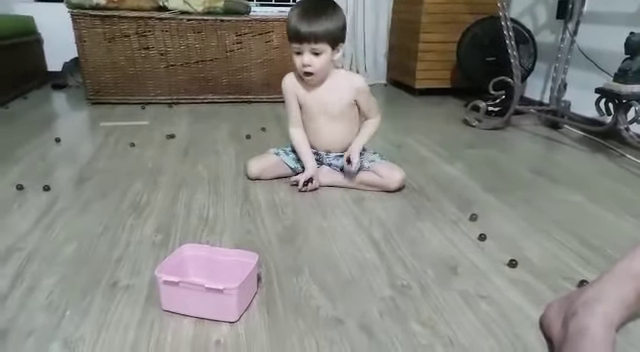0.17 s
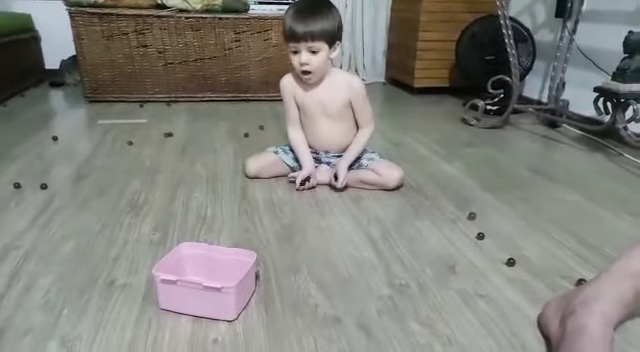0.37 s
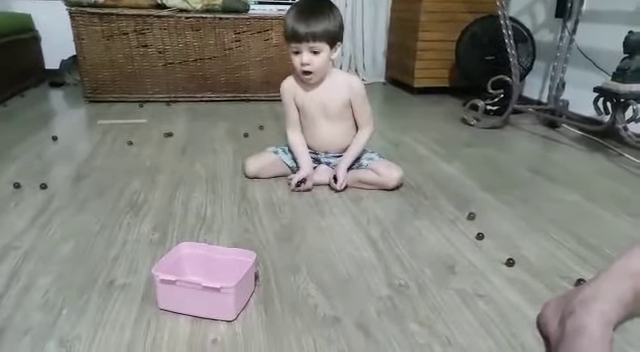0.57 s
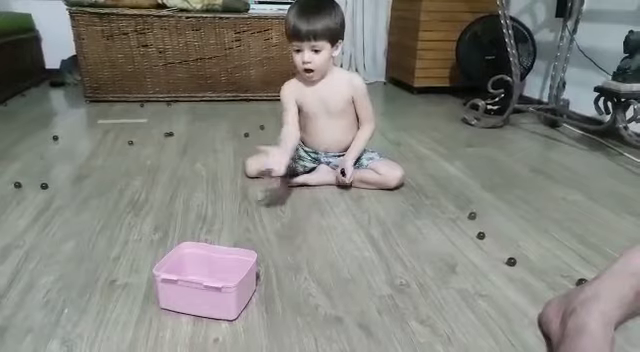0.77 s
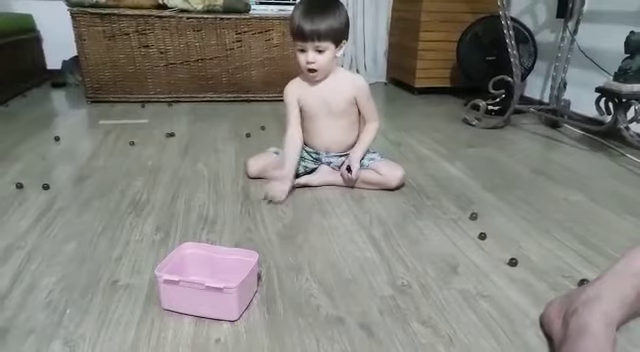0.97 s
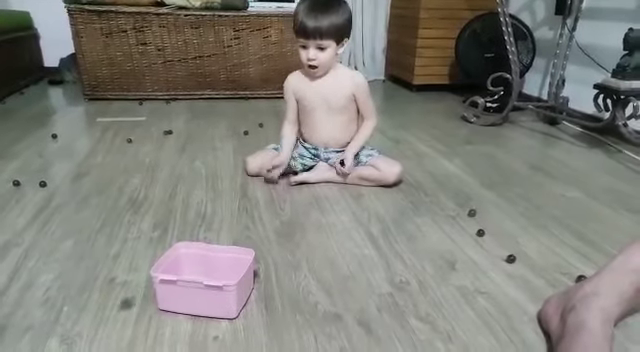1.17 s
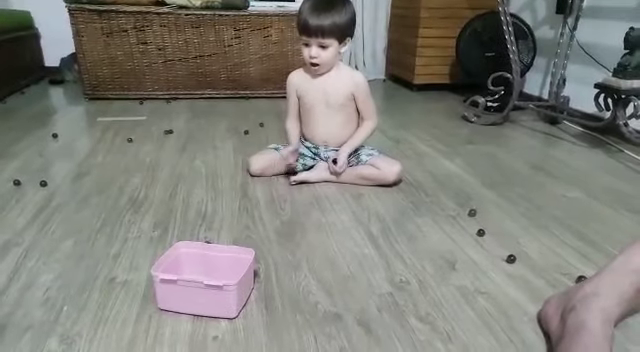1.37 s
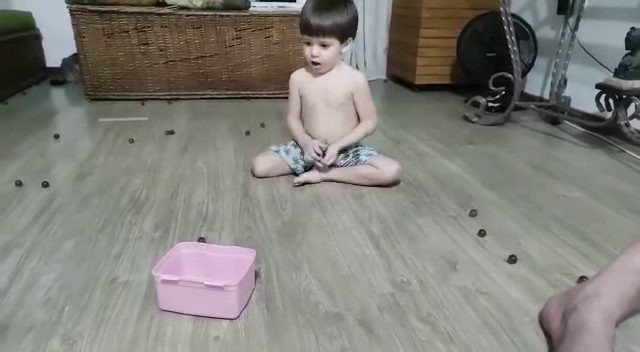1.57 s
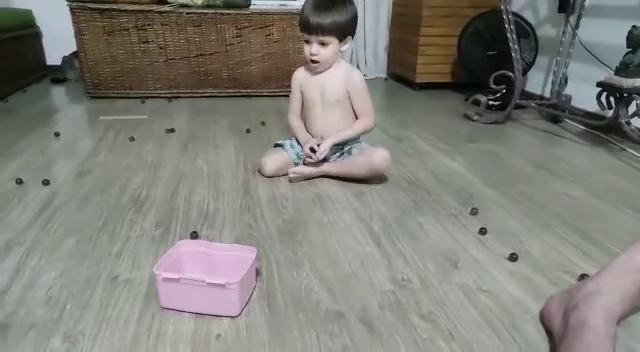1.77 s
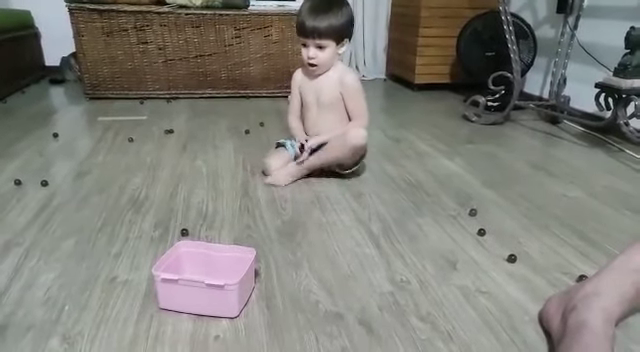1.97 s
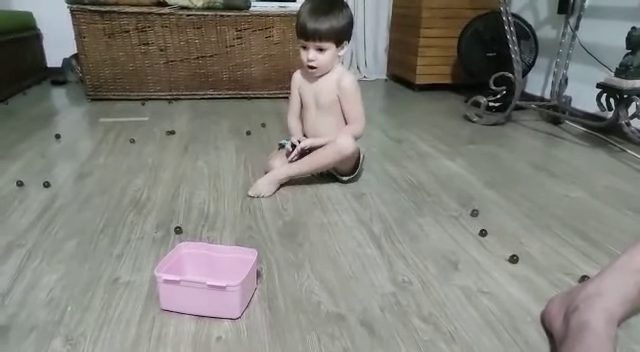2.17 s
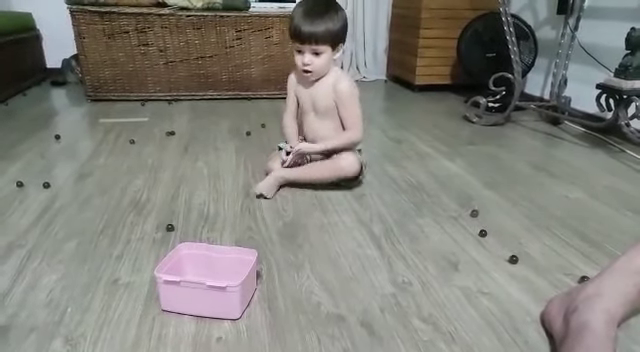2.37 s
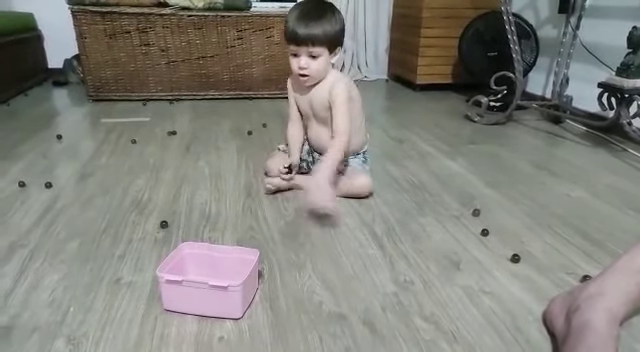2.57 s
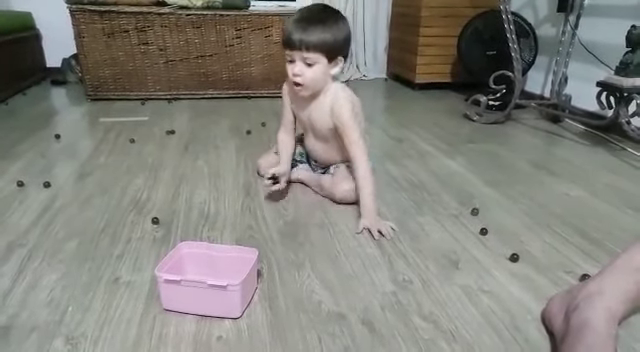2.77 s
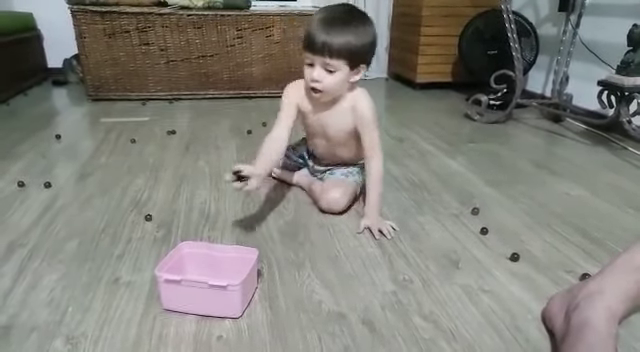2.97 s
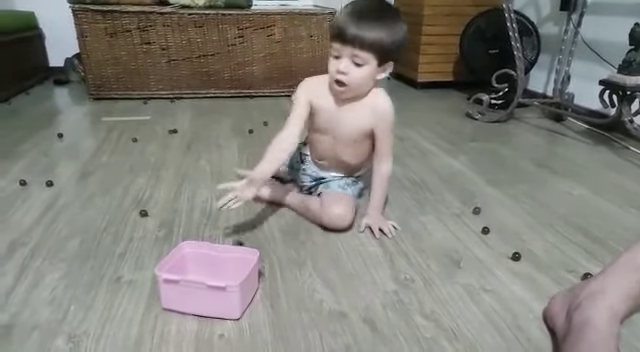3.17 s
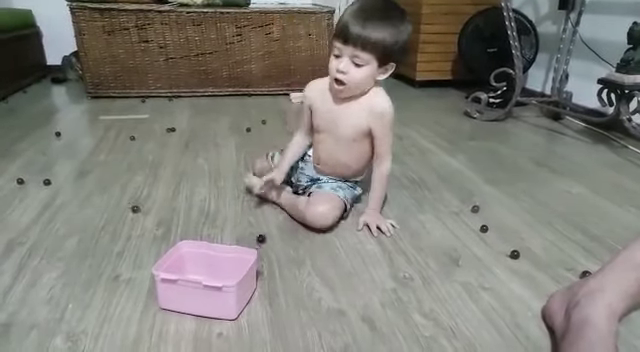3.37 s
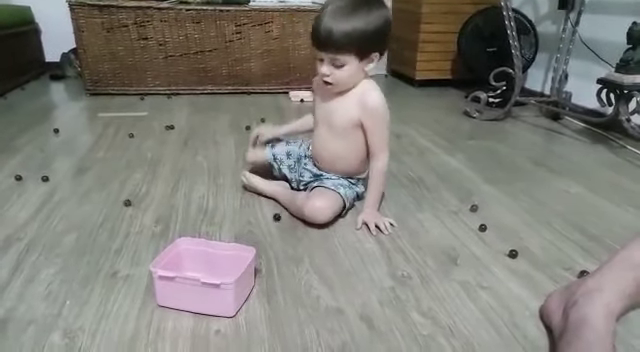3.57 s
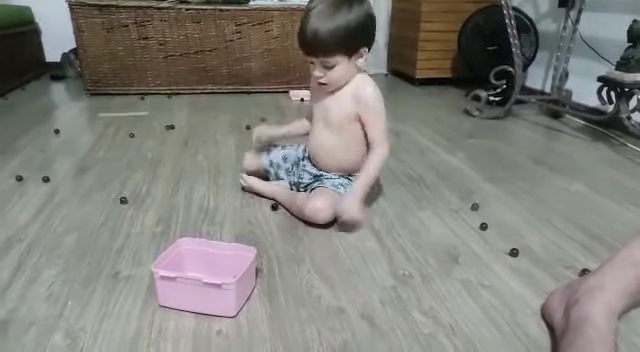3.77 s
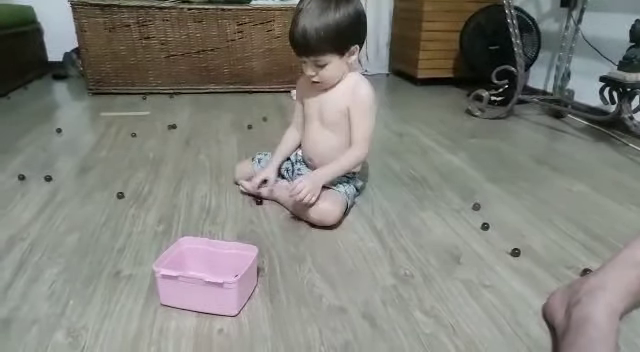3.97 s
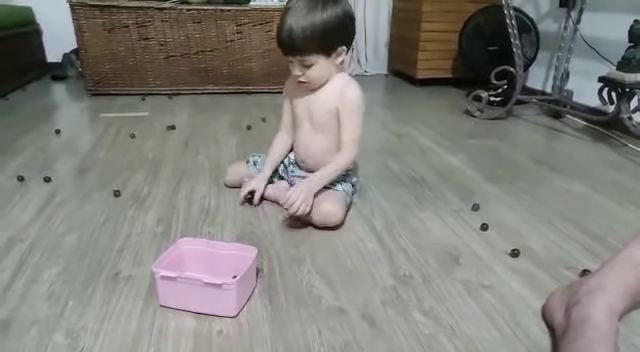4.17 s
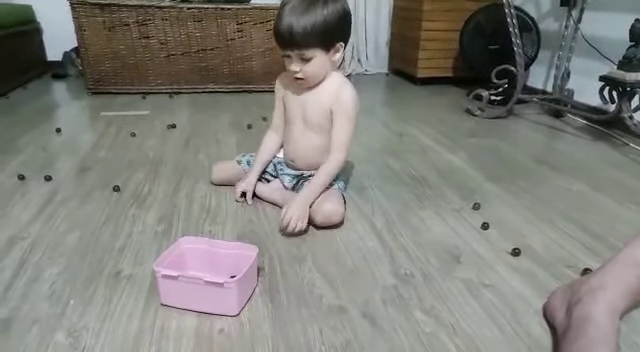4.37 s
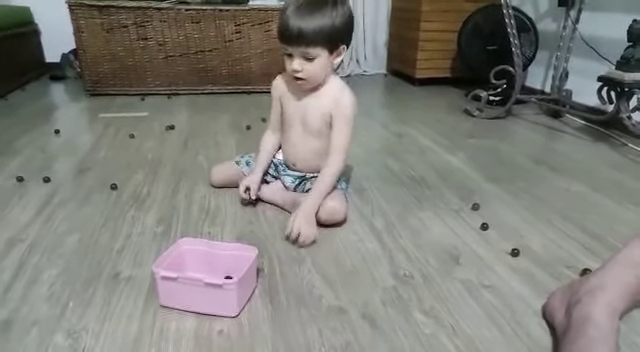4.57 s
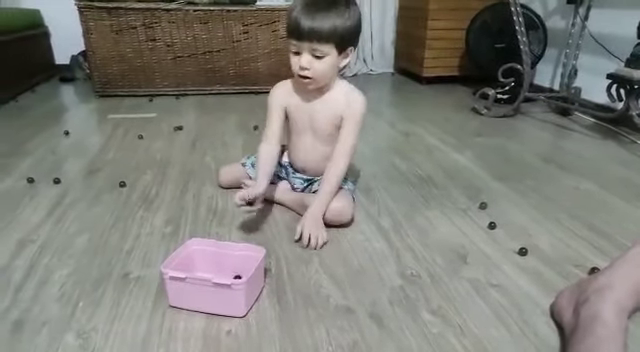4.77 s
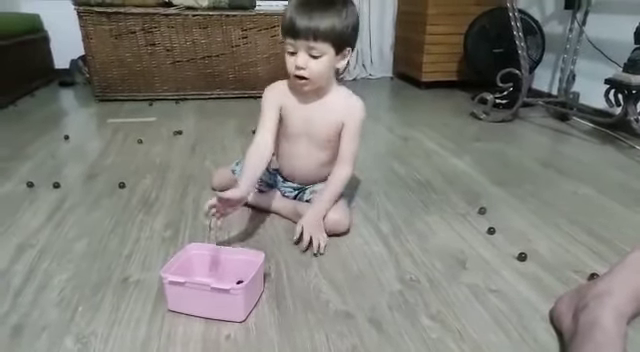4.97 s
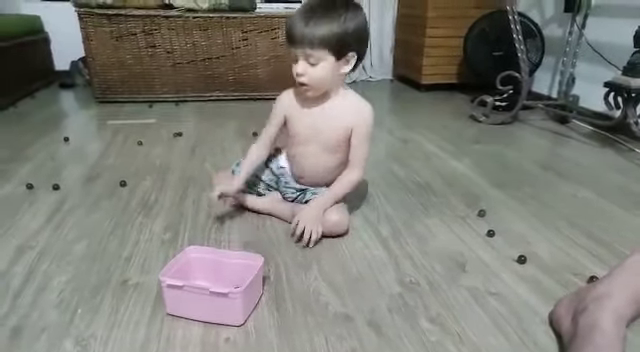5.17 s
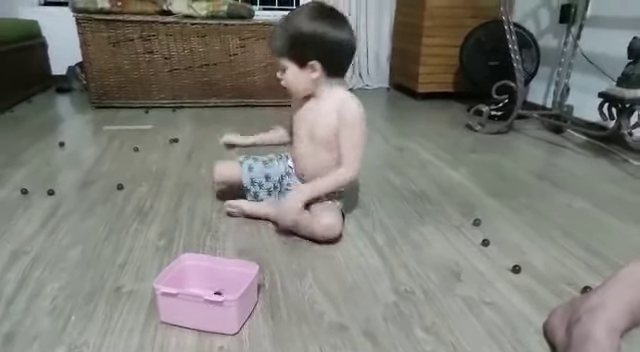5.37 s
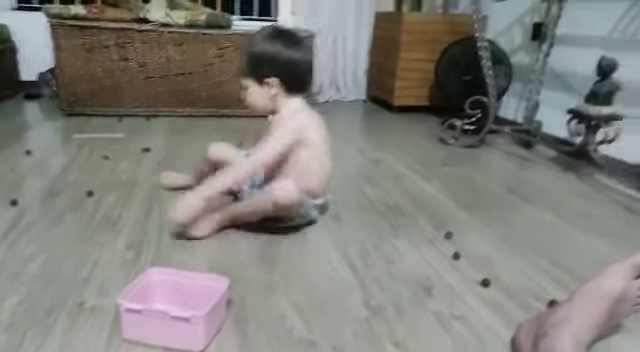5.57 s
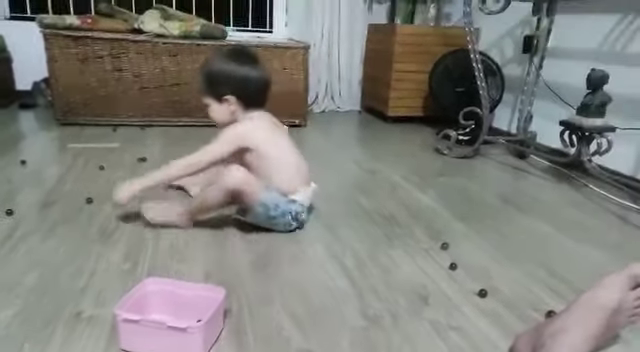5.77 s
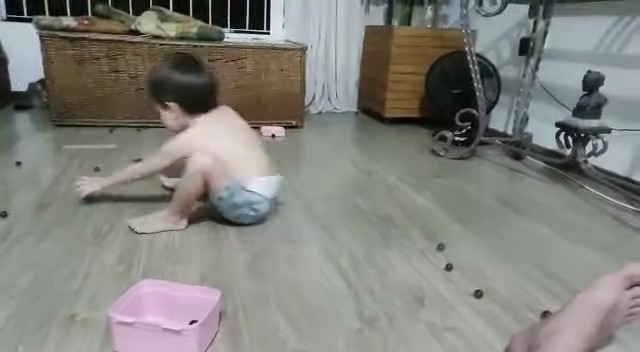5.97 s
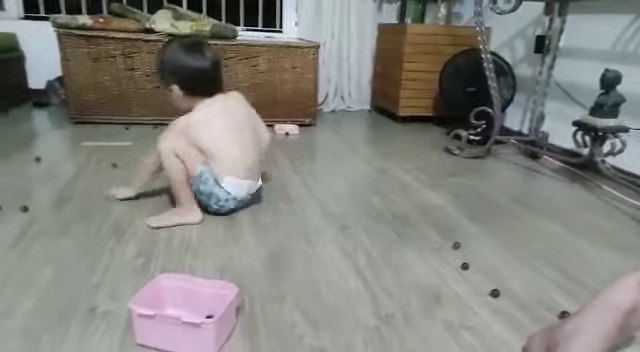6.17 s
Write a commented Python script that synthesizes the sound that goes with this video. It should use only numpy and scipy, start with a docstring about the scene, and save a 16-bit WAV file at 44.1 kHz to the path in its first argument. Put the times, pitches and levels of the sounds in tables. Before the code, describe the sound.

Three bursts of glass marbles clatter and roll across a laminate floor indoors, with dull microphone bumps and a faint fan hum.

```python
"""Marbles across a laminate floor

A child throws marbles three times in a bare, lively room. They land hard and set the boards ringing,
bounce, clink, knock into furniture and a plastic tub, and roll away. A palm pats the floor, and the
hand holding the recorder bumps its right microphone. At the end the child scoots along the boards.
A fan hums underneath."""
import sys
import numpy as np
from scipy import signal
from scipy.fft import rfft, irfft, next_fast_len
from scipy.io import wavfile

SR = 44100
rng = np.random.default_rng(int(sys.argv[2]) if len(sys.argv) > 2 else 0)


def pcm_store(signal):
    """Save signal as 16-bit PCM."""
    levels = np.round(np.clip(np.atleast_2d(signal), -1, 1) * 32767)
    wavfile.write(sys.argv[1], SR, levels.astype(np.int16).T)


N = 273640
TIME = np.arange(N) / SR
RING_SIZE = 32768  # samples for one hit and its tail
RING_HZ = np.maximum(np.arange(RING_SIZE // 2 + 1) * SR / RING_SIZE, 1)

# marbles landing and bouncing; a shorter, harder contact reaches higher into the treble:
# start_s, level_db, reach_hz, thud_db, echo_db
BOUNCE_HITS = [(1.0689, -21, 4030, -12, 4), (1.081, -20.5, 4300, -10, 5.5), (1.2156, -20, 4100, -9, -0.5),
               (1.226, -20.5, 4400, -17, -3), (1.2619, -36, 3400, -14, -8), (1.296, -23, 3030, -6.5, -1),
               (1.4653, -33.5, 1900, -10, -4), (3.2248, -24, 1300, -4.5, 3.5), (3.274, -18, 2290, 4.5, -3),
               (3.282, -28, 1310, 8, -4), (3.3239, -20, 5000, -10.5, 1.5), (3.42, -19, 3380, -15, -0.5),
               (3.451, -24, 2780, -12.5, -2), (5.148, -26.5, 1310, -5.5, 1), (5.172, -17.5, 2160, -1.5, -1),
               (5.329, -21.5, 1470, 5, -2.5), (5.397, -24, 1750, 5.5, -5), (5.4507, -25.5, 1160, 6.5, -2)]
# marbles running into furniture and skirting: start_s, level_db, reach_hz, echo_db
COLLISION_HITS = [(1.4416, -32.5, 4795, -4), (1.565, -36, 1000, -8), (1.6106, -29.5, 1100, 0),
                  (1.6664, -30.5, 4700, -3), (1.9089, -41.5, 3360, -8.5), (3.7312, -41.5, 2370, -4.5),
                  (3.9139, -50, 2200, -11), (4.089, -46.5, 1815, -2.5), (4.1414, -52.5, 1800, -6),
                  (4.3972, -54, 3003, -0.5)]
# a hand set down on the floor: start_s, level_db, reach_hz, echo_db
PAT_HITS = [(2.826, -47.5, 907, 0.5)]
# bright edge of a hit on the open floor: freq_hz, gain_db
BOUNCE_EQ = [(2000, -0.5), (3200, 4), (4400, 5), (5600, 9), (8000, 12), (11000, 17), (15000, 14.5)]
# woody edge of a hit on furniture: freq_hz, gain_db
COLLISION_EQ = [(230, -6), (700, 1.5), (2000, 8.5), (4400, -1.5), (6300, 0.5), (11000, 2)]
# broad tone of the struck floor: freq_hz, gain_db
FLOOR_EQ = [(30, -6), (110, 15), (280, 30.5), (430, 39), (720, 38.5), (1000, 36.5), (1500, 33), (2400, 36),
            (3200, 32.5), (4600, 37.5), (6300, 25.5), (8500, 20), (11000, 8), (15000, 0.5)]
# the boards' resonances: pitch_hz, width_hz, gain_db
FLOOR_MODES = [(431, 8.9, 6), (722, 19, 5.5), (1112, 67, 4.5), (1247, 6.9, 4), (2596, 17, -4),
               (2650, 21, 0.5), (2720, 34, 5.5), (3120, 25, 1.5), (3660, 35, 3.5), (3960, 25, 5.5),
               (4080, 21, 0.5), (4287, 16, 5.5), (4600, 16, 3), (4680, 25, 6.5)]
# a marble against the plastic tub: start_s, level_db
TUB_HITS = [(5.172, 16.5), (5.329, 7.5), (5.451, 2)]
# the tub's hollow ring: pitch_hz, width_hz, gain_db
TUB_RING = [(414, 28, -4), (1082, 47, 7.5), (1970, 130, 2.5), (2194, 90, 2), (2680, 30, -34)]
# marbles rolling: start_s, stop_s, level_db
ROLL_MOVES = [(1.07, 1.33, -34), (1.48, 1.98, -37.5), (3.25, 4.17, -30), (4.3, 4.36, -49),
              (5.16, 5.53, -33.5)]
# tone of glass rolling on the boards: freq_hz, gain_db
ROLL_EQ = [(60, -29), (130, -11.5), (300, -12.5), (450, -2), (680, 3.5), (900, -3.5), (1500, -5.5),
           (2600, -7), (3300, -21.5), (4800, -22), (7000, -51), (15000, -66.5)]
# marbles touching each other, in the hand or as they land: start_s, level_db
CLINK_HITS = [(0.809, -22.5), (3.2245, -5.5), (3.274, 4.5), (3.991, -28), (4.327, -33.5)]
# tone of glass on glass: freq_hz, gain_db
GLASS_EQ = [(100, -63.5), (2500, -37.5), (4000, -10), (5500, 2.5), (8000, -5.5), (11000, -21), (15000, -17)]
# bumps on the right microphone, a sharp one with a second, higher pulse: start_s, level_db, pitch_hz
MIC_BUMPS = [(1.4983, -18, 193), (1.944, -37.5, 175), (4.08, -40, 206.4), (4.569, -30, 178),
             (4.5695, -28, 650), (4.838, -46, 216.4), (5.5437, -9.5, 241)]
# the child shifts, then pushes off along the floor: start_s, stop_s, level_db
SCOOT_MOVES = [(5.74, 5.89, -59), (5.895, 5.945, -46.5)]
# rumble of the scoot: freq_hz, gain_db
SCOOT_EQ = [(40, -11), (130, 5.5), (250, -10), (600, -10), (1200, -16.5), (4500, -27.5), (12000, -38)]
# the fan's rush of air: freq_hz, gain_db
FAN_EQ = [(25, -20), (42, -17.5), (56, -5.5), (68, -8), (78, 2), (95, 0), (150, -6.5), (380, -7.5),
          (530, -13), (1150, -13), (1400, -17.5), (2500, -19), (3200, -27), (4700, -26.5), (7500, -35),
          (16000, -43)]
# the room's reverb time: freq_hz, t60_s
REVERB_DECAY = [(150, 1), (500, 0.76), (2000, 0.7138), (4200, 0.5746), (8000, 0.5), (14000, .36)]
# tone of the reverb against the direct sound: freq_hz, gain_db
REVERB_EQ = [(150, 6), (600, -0.5), (2000, 5), (4200, 2.5), (8000, 0.5), (14000, -3)]
# how alike left and right sound: freq_hz, correlation
STEREO_LIKENESS = [(100, .9), (300, 0.99), (640, 0.83), (1400, 0.02), (15000, 0.19)]
# lean of the stereo image: freq_hz, left_minus_right_db
STEREO_BALANCE = [(100, -1), (380, 0.5), (700, -2), (1300, -8), (2400, -6.5), (4400, -3.5), (8000, 0.5),
                  (15000, 5.5)]


def bounces(thud_below_hz=260, thud_gone_hz=500):
    """Glass dropping on laminate: a bright crack, with a thud where the boards give."""
    colour = at_hz(BOUNCE_EQ, RING_HZ)
    bass = at_hz([(thud_below_hz, 1), (thud_gone_hz, 0)], RING_HZ)
    return strike_boards([(s, level_db + contact(reach_hz) + colour + thud_db * bass, echo_db)
                          for s, level_db, reach_hz, thud_db, echo_db in BOUNCE_HITS])


def collisions(room_db=-0.5):
    """Glass rolling into wood: a woodier knock."""
    colour = at_hz(COLLISION_EQ, RING_HZ)
    return strike_boards([(s, level_db + contact(reach_hz) + colour, room_db + echo_db)
                          for s, level_db, reach_hz, echo_db in COLLISION_HITS])


def contact(reach_hz, slope=4.7, tick_db=-26.5):
    """Force spectrum of one contact in dB: flat up to its reach, then falling to a faint glassy tick."""
    return 10 * np.log10(1 / (1 + (RING_HZ / reach_hz) ** slope) + from_db(tick_db) ** 2)


def strike_boards(blows, lead_s=0.0027, coincidence_hz=3800):
    """Each blow (start_s, force_db, echo_db) rings the boards and the room."""
    out = np.zeros((2, N))
    # treble bending waves outrun the air, so each hit opens with a falling chirp
    arrival_s = lead_s * np.minimum(np.sqrt(coincidence_hz / RING_HZ), 1)
    chirp = np.exp(-2j * np.pi * np.cumsum(arrival_s) * SR / RING_SIZE)
    modes_db = sum(db * np.abs(resonance(hz, width)) ** 2 for hz, width, db in FLOOR_MODES)
    boards = causal(at_hz(FLOOR_EQ, RING_HZ) + modes_db + pan_db(RING_HZ)) * chirp
    for (s, force_db, echo_db), tail in zip(blows, room_tails(len(blows))):
        hit = crack() + from_db(echo_db) * tail
        add(out, s - lead_s, irfft(hit * boards * causal(force_db)))
    return out


def crack(ring_s=0.0092, ring_db=4.5, right_lag_s=0.00027):
    """Spectrum of a dry attack: a pulse and a few milliseconds of scatter from the boards around it."""
    t = np.arange(RING_SIZE) / SR
    scatter = rng.standard_normal((2, RING_SIZE)) * from_db(-40 * t / ring_s)
    scatter = rfft(scatter / np.linalg.norm(scatter, axis=1, keepdims=True))
    alike = np.clip(at_hz(STEREO_LIKENESS, RING_HZ), 0, 1)
    scatter[1] = alike * scatter[0] + np.sqrt(1 - alike ** 2) * scatter[1]
    pulse = (1 + from_db(ring_db) * scatter) / np.hypot(1, from_db(ring_db))
    return pulse * np.exp(-2j * np.pi * RING_HZ * np.array([[0], [right_lag_s]]))


def tub(room_db=2.5):
    """The empty plastic tub answers a blow with a short hollow ring."""
    out = np.zeros((2, N))
    modes = sum(from_db(db) * resonance(hz, width) for hz, width, db in TUB_RING)
    body = modes * from_db(pan_db(RING_HZ))
    for (s, level_db), tail in zip(TUB_HITS, room_tails(len(TUB_HITS))):
        hit = crack() + from_db(room_db) * tail
        add(out, s, from_db(level_db) * irfft(hit * body))
    return out


def rolling(contacts_per_s=450, spread_db=3.5, room_db=-4.0):
    """Rolling marbles patter over the grain of the boards: a stream of tiny contacts at five spots."""
    patter = np.zeros((2, N))
    colour = causal(at_hz(ROLL_EQ, RING_HZ) + pan_db(RING_HZ))
    tails = room_tails(count=5)
    for tail in tails:
        touches = rng.random(N) < contacts_per_s / len(tails) / SR
        sizes = from_db(spread_db * np.minimum(rng.exponential(1, N), 4))
        grains = touches * sizes * rng.choice([-1, 1], N)
        response = irfft((crack() + from_db(room_db) * tail) * colour)
        patter += signal.fftconvolve(grains[None], response, axes=1)[:, :N]
    # a roll swells as the marbles first land, under the bounces,
    # fades as they slow, and dies in the room when they stop
    envelope = motion(ROLL_MOVES, rise_s=0.054, release_db_per_s=151, slowing_db_per_s=21.5)
    return rms_one(patter) * envelope


def clinks(room_db=-1.0):
    """Glass on glass: a thin, high tick."""
    out = np.zeros((2, N))
    for (s, level_db), tail in zip(CLINK_HITS, room_tails(len(CLINK_HITS))):
        hit = crack() + from_db(room_db) * tail
        add(out, s, irfft(hit * causal(level_db + at_hz(GLASS_EQ, RING_HZ))))
    return out


def bumps(rise_cycles=0.22, left_db=-28):
    """A finger taps the case by the right microphone: a dull pulse of about two swings."""
    out = np.zeros((2, N))
    t = np.arange(RING_SIZE) / SR
    for s, level_db, hz in MIC_BUMPS:
        age = t * hz / rise_cycles
        swing = -np.sin(2 * np.pi * hz * t) * age ** 2 * np.exp(-age)
        add(out, s, from_db([[level_db + left_db], [level_db]]) * swing / np.abs(swing).max())
    return out


def pats():
    """A soft palm on the boards: dull and quiet."""
    return strike_boards([(s, level_db + contact(reach_hz), echo_db)
                          for s, level_db, reach_hz, echo_db in PAT_HITS])


def scoot():
    """Legs and shorts rub over the boards with a low rumble."""
    return motion(SCOOT_MOVES, rise_s=0.023, release_db_per_s=86) * diffuse(SCOOT_EQ)


def fan(air_db=-60, hum_db=-62.5, motor_hz=119.6, waver=0.3):
    """A bed of softly rushing air over the motor's slightly wavering hum."""
    below_5_hz = signal.butter(2, 5, fs=SR, output="sos")
    swell, drift = rms_one(signal.sosfilt(below_5_hz, rng.standard_normal((2, N))))
    hum = (1 + waver * swell) * np.sin(2 * np.pi * motor_hz * TIME + waver * drift)
    return from_db(air_db) * diffuse(FAN_EQ) + from_db(hum_db) * rms_one(hum)


def room_tails(count, build_s=0.0019):
    """A reverb spectrum for each spot on the floor: noise dying band by band, fastest in the treble."""
    white = rfft(diffuse([(20, 0), (20000, 0)]))
    hz = np.arange(white.shape[1]) * SR / N
    edges_hz = np.array([20, 250, 500, 1000, 2000, 3200, 4800, 6400, 8500, 11000, 18000])
    t = np.arange(RING_SIZE) / SR
    attack = 1 - np.exp(-(t / build_s) ** 2)
    starts = rng.integers(0, N - RING_SIZE, count)
    tails = np.zeros((count, 2, RING_SIZE))
    for low, high in zip(edges_hz, edges_hz[1:]):
        band = irfft(white * ((hz >= low) & (hz < high)), N)
        t60_s = at_hz(REVERB_DECAY, np.sqrt(low * high))
        fade = attack * from_db(-60 * t / t60_s)
        fade /= np.linalg.norm(fade)
        for tail, start in zip(tails, starts):
            tail += band[:, start:start + RING_SIZE] * fade
    return rfft(tails) * from_db(at_hz(REVERB_EQ, RING_HZ))


def diffuse(eq, right_lag_s=0.00021):
    """Noise from all sides at unit power: centred in the bass, wide in the treble."""
    size = next_fast_len(N)
    hz = np.arange(size // 2 + 1) * SR / size
    mid, side = rfft(rng.standard_normal((2, size)))
    alike = np.clip(at_hz(STEREO_LIKENESS, hz), -1, 1)
    pair = np.sqrt(1 + alike) * mid + np.sqrt(1 - alike) * side * [[1], [-1]]
    pair[1] *= np.exp(-2j * np.pi * hz * right_lag_s)
    return rms_one(irfft(pair * from_db(at_hz(eq, hz)), size)[:, :N])


def motion(moves, rise_s, release_db_per_s, slowing_db_per_s=0):
    """Joint envelope of several moves: each rises, holds or fades, and dies away after its stop."""
    power = 0
    for start_s, stop_s, level_db in moves:
        age_s = np.maximum(TIME - start_s, 0)
        stopped_s = np.maximum(TIME - stop_s, 0)
        attack = np.minimum(age_s / rise_s, 1)
        fade = from_db(level_db - slowing_db_per_s * age_s - release_db_per_s * stopped_s)
        power += (attack * fade) ** 2
    return np.sqrt(power)


def resonance(hz, width_hz):
    """Response of one ringing mode, 1 at its peak."""
    return 1 / (1 + 1j * (RING_HZ / hz - hz / RING_HZ) * hz / width_hz)


def causal(level_db):
    """Minimum-phase filter for an EQ curve: nothing rings before the hit."""
    cepstrum = irfft(level_db * np.log(10) / 20)
    cepstrum[..., 1:RING_SIZE // 2] *= 2
    cepstrum[..., RING_SIZE // 2 + 1:] = 0
    return np.exp(rfft(cepstrum))


def pan_db(hz):
    """Left and right gain: the right microphone hears more of the upper mids."""
    return at_hz(STEREO_BALANCE, hz) * np.array([[0.5], [-0.5]])


def add(out, start_s, sound):
    """Mix a stereo sound in, fading its last quarter to nothing."""
    start = int(start_s * SR)
    faded = sound * np.clip(np.linspace(4, -0.1, sound.shape[1]), 0, 1)
    out[:, start:start + sound.shape[1]] += faded[:, :N - start]


def at_hz(points, hz):
    """Read a curve on a log-frequency axis."""
    known_hz, values = np.transpose(points)
    return np.interp(np.log(np.maximum(hz, 1)), np.log(known_hz), values)


def from_db(db):
    """Decibels to gain."""
    return 10 ** (np.asarray(db) / 20)


def rms_one(x):
    """Scale to unit power."""
    return x / np.sqrt(np.mean(x ** 2) + 1e-20)


def scene():
    """The mix: marbles up front, hand and body noises around them, the fan underneath."""
    return bounces() + collisions() + tub() + rolling() + clinks() + pats() + bumps() + scoot() + fan()


def record(dry, low_cut_hz=45, high_cut_hz=16000):
    """The microphones lose the deep bass, the tallest peaks are rounded and the top is cut."""
    lean = signal.sosfilt(signal.butter(2, low_cut_hz, "high", fs=SR, output="sos"), dry)
    rounded = lean / (1 + lean ** 4) ** (1 / 4)
    return signal.sosfilt(signal.cheby1(16, 0.2, high_cut_hz, fs=SR, output="sos"), rounded)


dry = scene()
out = record(dry)
pcm_store(out)
```